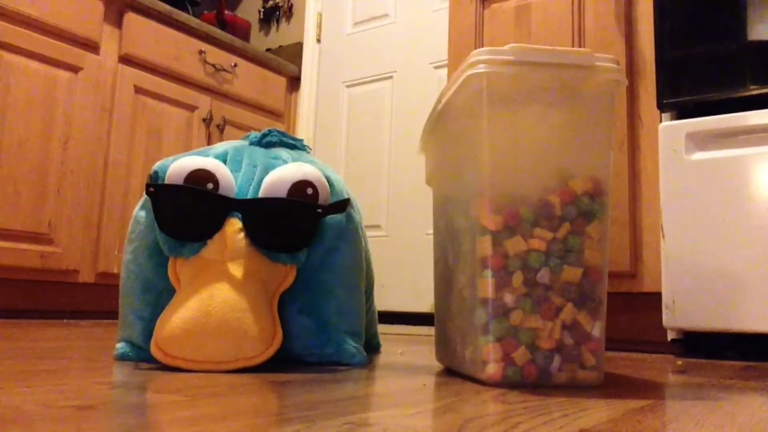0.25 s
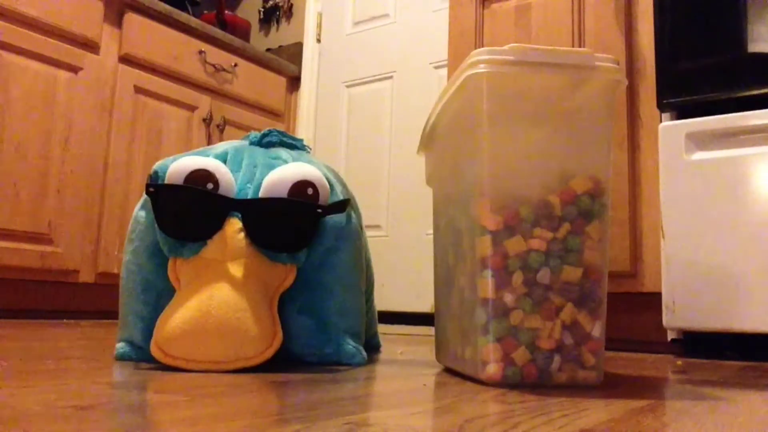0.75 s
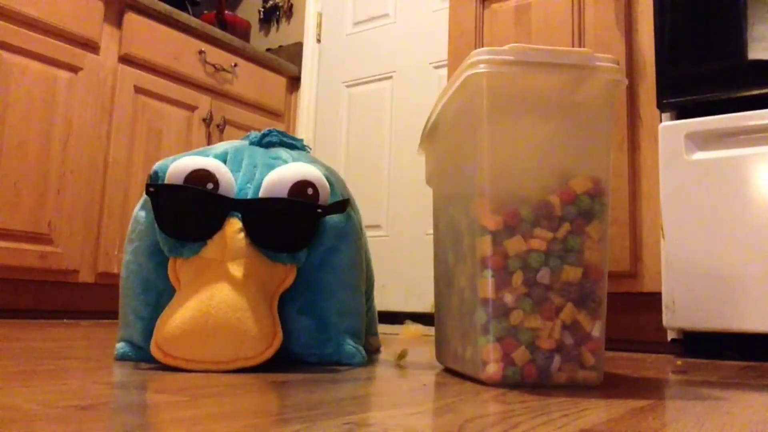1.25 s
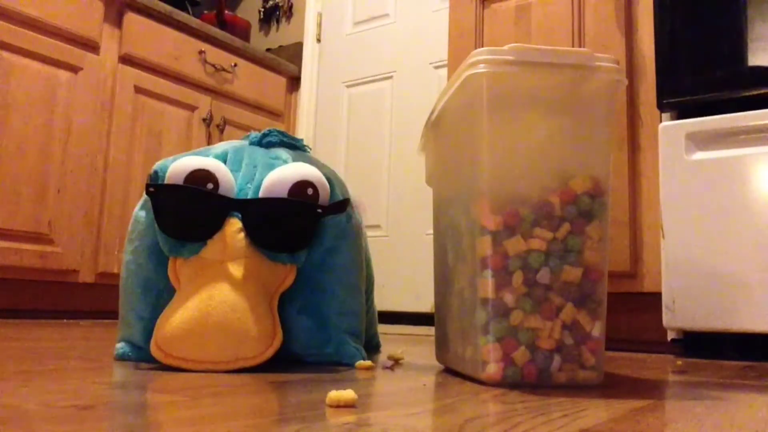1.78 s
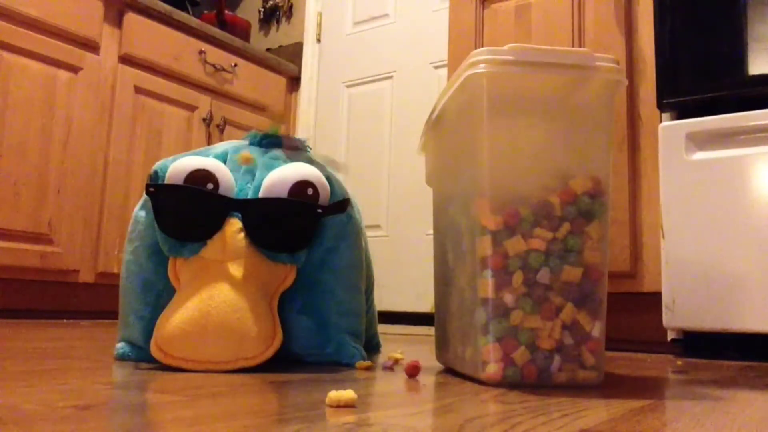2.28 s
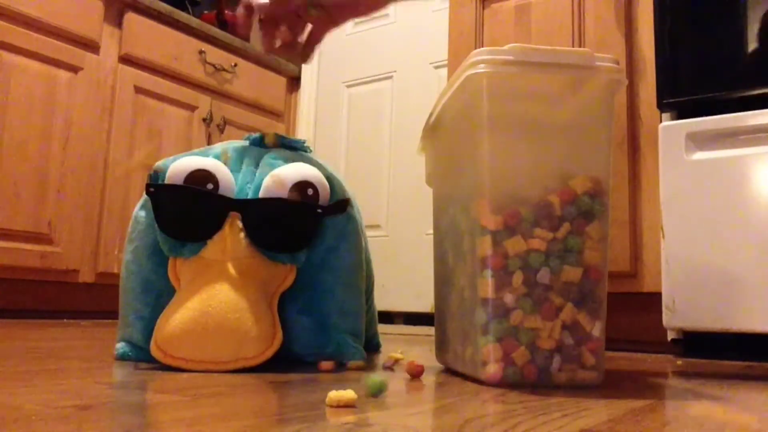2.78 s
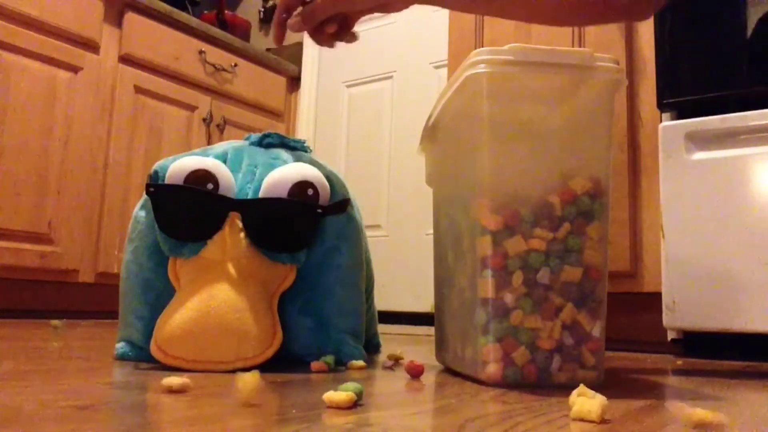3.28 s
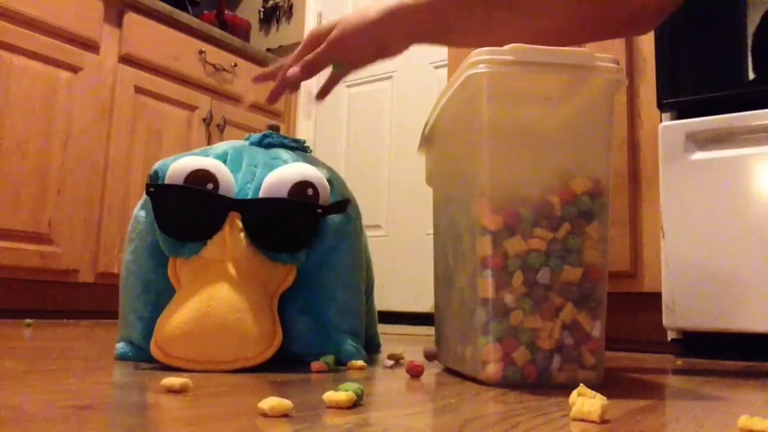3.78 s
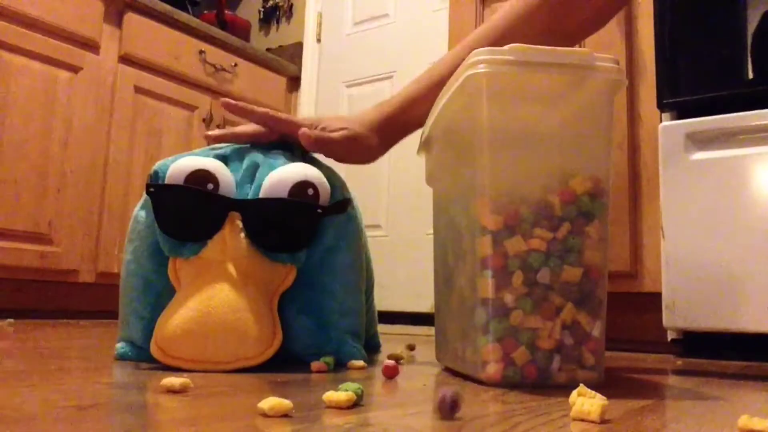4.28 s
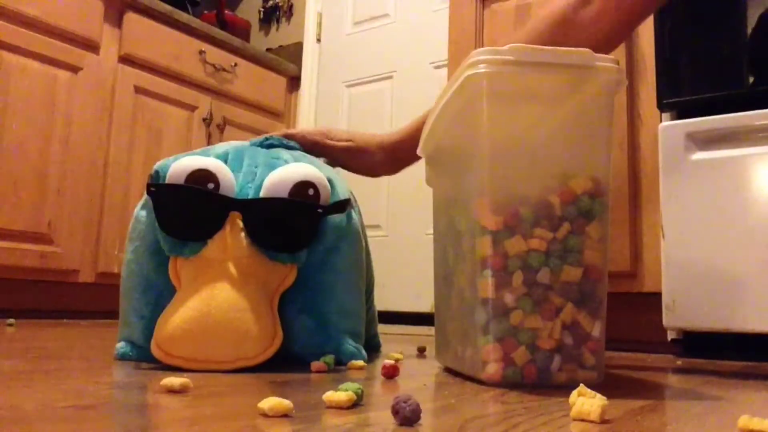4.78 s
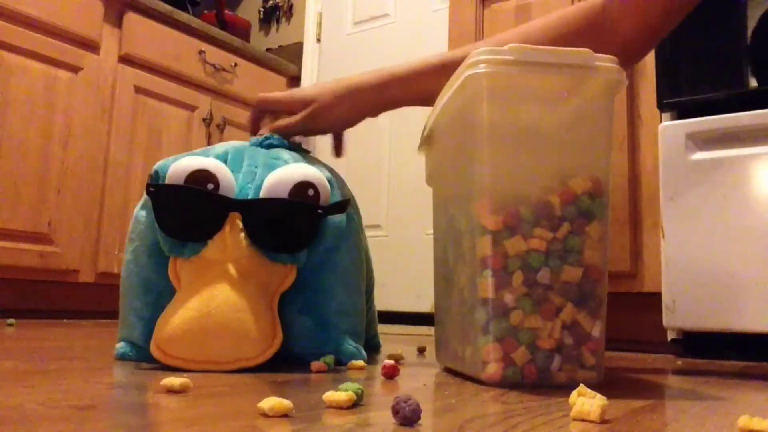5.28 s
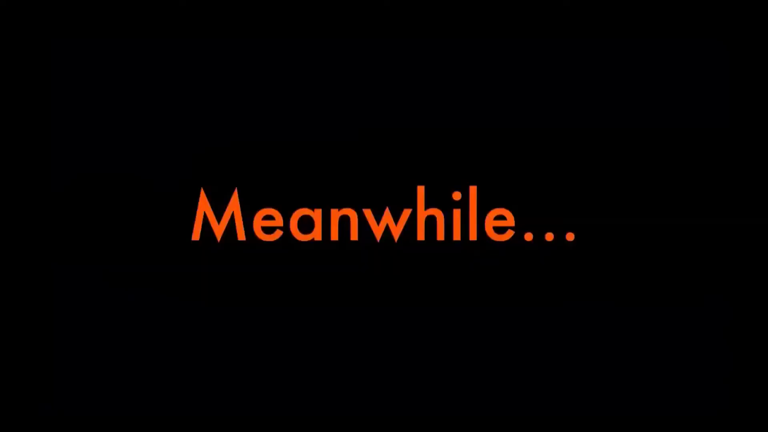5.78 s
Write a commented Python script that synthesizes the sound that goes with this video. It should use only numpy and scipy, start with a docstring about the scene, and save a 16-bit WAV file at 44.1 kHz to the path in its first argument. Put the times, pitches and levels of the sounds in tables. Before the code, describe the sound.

Small crunchy pieces bounce sharply on wooden boards close to the microphone, with one soft plush thud and faint rustling, before everything cuts dead.

```python
"""Cereal tossed at a plush toy, kitchen floor

Dry pieces bounce over a wooden kitchen floor, close to a phone microphone lying on it. Each landing ticks,
rings the piece for a few milliseconds and knocks the boards, built from noise bursts and decaying modes.
Short bright crackles swell, pieces tumble to rest farther off, one throw thuds into the plush; soft rustling
runs throughout. The hard room echoes landings, crackles and tumbles over a fridge of humming lines and fan
noise, then a dead stop.
"""
import sys
import numpy as np
from scipy import signal
from scipy.fft import rfft, irfft
from scipy.io import wavfile
from scipy.ndimage import uniform_filter1d

SR = 44100
rng = np.random.default_rng(int(sys.argv[2]) if len(sys.argv) > 2 else 0)


def wav_out(sig):
    """Save sig, one row per channel (or a flat mono array), as 16-bit PCM at SR to the path in sys.argv[1]."""
    wavfile.write(sys.argv[1], SR, np.round(np.clip(np.atleast_2d(sig).T, -1, 1) * 32767).astype(np.int16))


N = 266364
T = np.arange(N) / SR  # time line, s
AGE = np.arange(4096) / SR  # time since a blow, s

# fridge hum lines: [f/Hz, level/dB rms before wavering, wavering 0-1]
FRIDGE_LINES = [(119, -59, 0), (235.3, -55.5, 0.3), (356, -50.5, 1)]
# spectrum shape of the fridge's fan and air: [f/Hz, relative level/dB per Hz]
FRIDGE_AIR = [(30, -48.5), (60, -28), (95, -19.5), (115, -15.5), (165, 1.5), (280, -5), (345, 5),
              (420, -5.5), (650, -9.5), (900, -12), (1500, -22.5), (2500, -30), (5000, -31), (15000, -34.5)]
# faint rustle, later the hand on the plush fur: [t/s, level/dB rms]
RUSTLE_LEVEL = [(0, -62), (.4, -66), (1, -65), (4.2, -62), (4.45, -63), (4.85, -77)]
# louder landings: [t/s, ring level/dB over 1 ms, ring f/Hz, tick level/dB re ring, wood level/dB re ring]
LANDINGS = [(0.47, -13, 3580, -13, -8.5), (0.658, -17, 3920, -25, -3.5), (0.7883, -27, 2500, -18, 4),
            (0.84, -38, 3180, -26, 8), (0.8906, -28, 2960, -24, 0), (0.9015, -34, 2740, -24, -4),
            (0.935, -28, 2700, -24, -2), (0.9613, -18, 3750, -11.5, -4.5), (0.989, -23, 2580, -12, -1.5),
            (1.0296, -31.5, 2540, -6, 0), (1.0394, -36.5, 3150, -21, 3), (1.1264, -17, 3300, -12.5, -6),
            (1.2466, -28.5, 3050, -21, -5), (1.2828, -27, 2970, -17, -3.5), (1.3252, -38, 4740, -14, -12),
            (1.3668, -37.5, 3100, -18, -1.5), (1.4085, -35.5, 4450, -19, -7), (1.5298, -39, 4430, -13, -13),
            (1.6818, -38, 4400, -17, -14), (1.8135, -23, 2980, -14, -4), (1.897, -39, 2920, -16, -3),
            (1.9404, -35, 3170, -20.5, -7), (2.34, -27.5, 2660, -15.5, 3.5), (2.382, -30.5, 2810, -11, 0),
            (2.3897, -28, 2880, -11, 0), (2.446, -19.5, 3300, -15.5, 0.5), (2.4612, -26, 3300, -14, 2),
            (2.5074, -39, 2930, -25, 4.5), (2.5523, -34, 3330, -32, 2.5), (2.581, -26, 3720, -19, -1.5),
            (2.6102, -33, 3260, -21.5, -4.5), (2.6456, -20.5, 3120, -8.5, -5),
            (2.692, -23, 3470, -25.5, -6), (2.7203, -15.5, 3040, -17.5, -4), (2.7769, -23, 3670, -12, -6),
            (2.7879, -32.5, 2840, -25, 6.5), (2.8368, -23.5, 3800, -17, -19),
            (2.8425, -21.5, 4000, -22.5, -10.5), (2.8477, -26.5, 3370, -3, -0.5),
            (2.882, -28, 3630, -16, -6.5), (2.8968, -27.5, 3200, -32, -6.5),
            (2.9023, -23.5, 3700, -21.5, -2.5), (2.944, -20.5, 3530, -11.5, -12.5),
            (2.9577, -17.5, 3530, -20.5, -10.5), (2.9856, -20.5, 3390, -15, -11.5),
            (2.995, -27, 3340, -23, -10), (3.008, -18.5, 4160, -14.5, -12), (3.028, -33, 3400, -5, 1),
            (3.059, -29, 4040, -18, -11), (3.0975, -30.5, 3300, -8, -6), (3.1218, -30.5, 4070, -3.5, -2.5),
            (3.1787, -29.5, 3140, -9.5, -16), (3.2314, -28, 4060, -7, -6), (3.2808, -30.5, 4100, -9, -7.5),
            (3.362, -35.5, 3970, -27, -17), (3.414, -37, 3970, -26, -6), (3.6565, -33, 3060, -7.5, 4.5),
            (3.6815, -20, 3330, -33, -6), (3.789, -33.5, 3340, -28, -2), (3.8303, -33, 3130, -23, -3.5),
            (3.9111, -28, 3460, -16, -6.5), (3.9721, -38.5, 3170, -24, 4), (4.022, -37, 3080, -31, 1),
            (4.0388, -22.5, 3880, -48.5, -9.5), (4.0575, -19.5, 3300, -25, -4.5),
            (4.1885, -47, 3900, -25, -6.5), (4.218, -40, 3320, -27, -3), (4.2419, -29.5, 3570, -34, -4.5)]
# modes of a piece: [multiple of its ring pitch, relative level/dB, t60/s for a landing at -20 dB]
PIECE_MODES = [(.85, -11, 0.0018), (1, 12.5, 0.0015), (1.28, 9.5, 0.0011)]
# modes of the floor's hard top layer: [f/Hz, relative level/dB, t60/s]
TOP_LAYER_MODES = [(1030, 6, 0.0063), (1420, 3, 0.013), (2056, -14, 0.076)]
# floorboard modes, low and slow: [f/Hz, relative level/dB, t60/s]
BOARD_MODES = [(358, 1.5, 0.051), (424, 7.5, 0.026), (501, 2, 0.031), (756, -5, 0.039)]
# kitchen echo: [f/Hz, level/dB re the sound sent into the room, t60/s]
ROOM_ECHO = [(250, -8, 0.36), (500, -9, 0.076), (980, -3.5, 0.12), (1940, -17.5, 0.65), (3870, -12.5, 0.29),
             (6400, -6.5, .36), (8360, -3.5, .32), (14000, -9, 0.14)]
# short crackles of bright grains, most just before a landing: [start t/s, length/s, level/dB over 1 ms]
CRACKLES = [(0.895, .008, -39), (1.023, 0.01, -39), (1.105, .01, -39), (1.116, .006, -41),
            (2.831, .007, -20)]
# pieces tumbling to rest: [start t/s, length/s, first tap level/dB before scatter and balance, ring f/Hz]
TUMBLING_PIECES = [(0.999, .26, -35.5, 3420), (1.258, 0.39, -40, 3940), (1.89, .12, -45.5, 3650),
                   (2.478, 0.82, -38, 3320), (2.95, 0.89, -30, 3750), (3.707, 0.19, -44.5, 3560),
                   (4.121, 0.23, -43.5, 3650), (4.483, 0.083, -52.5, 3620), (4.689, 0.05, -52, 3700)]
# thud in the plush: [t/s, body level/dB over 1 ms]
PLUSH_THUDS = [(2.244, -11.5)]
# modes of the plush: [f/Hz, relative level/dB, t60/s]
PLUSH_MODES = [(171.6, -1, 0.17), (135, -15, 0.12), (241, -2, 0.1), (334, -1.5, 0.077), (518, -14, 0.063)]

AIR_DB = -47  # rms of the fridge's air noise
BOARD_DB = -2  # boards re the knock of the top layer
KNOCK_LAG_S = .0009  # bending waves in the wood trail the crack of the piece
CONTACT_S = 0.023  # the piece's ring builds up while it presses on the floor
SPOT_DETUNE = .11  # top layer varies with the landing spot, share of pitch
TAPS_PER_S, SETTLE_DB_PER_S = 70, 39  # taps weaken as a piece loses energy
TAP_SCATTER_DB, TAP_DETUNE = 8, 0.023  # from tap to tap; detune as a share of the pitch
STOP_S = 0.036  # the last rocking dies away
FIRM_TAP_DB, FIRMNESS = -36.5, 0.39  # lighter taps lose this many dB of crust and wood per dB
END_S, TOP_HZ = 5.585, 15500  # the stop; upper limit of the phone


def undb(db):
    """Decibels to gain."""
    return 10 ** (np.asarray(db) / 20)


def fade(t, t60):
    """Exponential decay, 60 dB down after t60."""
    return np.exp(-np.log(1000) * t / t60)


def unit(x):
    """Scale each row to the energy of 1 ms at full level."""
    energy = np.sum(x ** 2, axis=-1, keepdims=True)
    return x / np.sqrt(energy * 1000 / SR)


def band(x, lo_hz, hi_hz):
    """Causal band-pass."""
    edges = [lo_hz, min(hi_hz, .45 * SR)]
    return signal.sosfilt(signal.butter(2, edges, "band", fs=SR, output="sos"), x)


def on_log(hz, points, values):
    """Straight lines on a log-frequency axis."""
    return np.interp(np.log(hz + 1), np.log(points), values)


def walk(rate):
    """Smooth random drift with unit spread, from random steps taken at this rate in Hz."""
    k = int(SR / rate)
    steps = np.repeat(rng.standard_normal(N // k + 1), k)
    drift = uniform_filter1d(uniform_filter1d(steps, k), k)[:N]
    return drift / drift.std()


def ring(modes, pitch, age, scatter_db, detune):
    """One row of decaying modes per blow; chance varies each mode's strength and tuning."""
    out = 0
    for hz, db, t60 in modes:
        size, shift = rng.standard_normal((len(pitch), 2)).T[:, :, None]
        mode_hz = hz * pitch * (1 + detune * shift)
        strength = undb(db + scatter_db * size)
        out = out + strength * fade(age, t60) * np.sin(2 * np.pi * mode_hz * age)
    return out


def burst(count, lo_hz, hi_hz, t60):
    """One row per blow of modes too dense to tell apart: decaying noise in a band."""
    noise = rng.standard_normal((count, len(AGE)))
    return unit(band(noise * fade(AGE, t60), lo_hz, hi_hz))


def click(lo_hz, hi_hz):
    """One sharp contact, heard in one band."""
    return unit(band(signal.unit_impulse(len(AGE)), lo_hz, hi_hz))


def place(times, rows):
    """Lay each row on the time line at its moment."""
    out = np.zeros(N + rows.shape[1])
    starts = (np.ravel(times) * SR).astype(int)
    for i, row in zip(starts, rows):
        out[i:i + len(row)] += row
    return out[:N]


def fridge():
    """Compressor lines, some wavering in level and phase, over steady fan noise."""
    bin_hz = np.arange(N // 2 + 1) * SR / N
    shape = undb(on_log(bin_hz, *np.transpose(FRIDGE_AIR)))
    air = irfft(rfft(rng.standard_normal(N)) * shape, N)
    out = undb(AIR_DB) * air / air.std()
    for hz, db, waver in FRIDGE_LINES:
        drift = 1 - waver + waver * (walk(28) + 1j * walk(28)) / np.sqrt(2)
        line = np.real(drift * np.exp(2j * np.pi * hz * T))
        out = out + undb(db) * np.sqrt(2) * line
    return out


def rustle():
    """Soft, uneven rubbing: mid-band noise whose level drifts."""
    rub = band(rng.standard_normal(N), 700, 2800) * undb(1.5 * walk(20))
    return rub / rub.std() * undb(np.interp(T, *np.transpose(RUSTLE_LEVEL)))


def landings():
    """The crust ticks and the piece rings; slow bending waves bring the wood's knock a little later."""
    s, db, hz, tick_db, wood_db = np.array(LANDINGS, float).T[:, :, None]
    count, same = len(s), np.ones_like(s)

    # a hard landing presses the piece into the wood and damps it; a light one lets it ring longer
    damping = undb(.25 * (db + 20))
    # stretching time while dividing the pitch alters the decay but not the frequency
    shell = ring(PIECE_MODES, hz / damping, AGE * damping, scatter_db=2, detune=.025)
    piece = unit(shell * (1 - fade(AGE, CONTACT_S)) ** 1.4)
    # nearby surfaces scatter each crack just after it
    scattered = unit(burst(count, 2000, 4810, t60=0.014) * (1 - fade(AGE, 0.023)))
    piece = unit(piece + undb(-5) * scattered)
    tick = unit(click(6200, 14000) + undb(8) * burst(count, 4900, 11000, t60=.009))

    top_layer = ring(TOP_LAYER_MODES, same, AGE, scatter_db=3, detune=SPOT_DETUNE)
    top_layer = unit(top_layer * (1 - fade(AGE, .003)))
    grain = unit(burst(count, 850, 2800, t60=.03) * (1 - fade(AGE, .012)))
    knock = unit(click(700, 2300) + top_layer + undb(-3) * grain)
    board = ring(BOARD_MODES, same, AGE, scatter_db=2.5, detune=.07)
    board = unit(board * (1 - fade(AGE, .009)) ** 2)

    crack = place(s, undb(db) * (piece + undb(tick_db) * tick))
    wood = undb(db + wood_db) * (knock - undb(BOARD_DB) * board)
    return crack + place(s + KNOCK_LAG_S, wood)


def kitchen(x, build_s=0.012):
    """Bright slaps from walls and ceiling, then a diffuse tail: each band's energy fills the room and drains."""
    age = T[:SR // 2]
    points, db, t60 = np.transpose(ROOM_ECHO)
    edges = 177 * 2 ** (np.arange(14) / 2)  # half-octave bands, Hz
    tail = 0
    for lo, hi in zip(edges, edges[1:]):
        centre = np.sqrt(lo * hi)
        decay = (fade(age, on_log(centre, points, t60)) * (1 - fade(age, build_s))) ** 2
        energy = signal.oaconvolve(band(x, lo, hi) ** 2, decay / decay.sum())[:N]
        field = band(rng.standard_normal(N), lo, hi)
        level = undb(on_log(centre, points, db)) * np.sqrt(np.abs(energy))
        tail = tail + level * field / field.std()
    bright = band(x, 5500, 15000)
    slaps = sum(np.interp(T - delay_s, T, bright) for delay_s in (.0133, .0163))
    return tail + undb(-15) * slaps


def crackle(s, length_s, db, burst_db=-8):
    """Quick bright grains at uneven moments grow louder; each is a short ring with a burst of treble."""
    count = 8
    when, shift = rng.random((count, 2)).T[:, :, None]
    along = (np.arange(count)[:, None] + when) / count  # share of the crackle
    pitch = 3600 * (.8 + .4 * shift)  # Hz
    grains = unit(ring(PIECE_MODES, pitch, AGE, scatter_db=2, detune=0))
    grains = grains + undb(burst_db) * burst(count, 4500, 11000, t60=.006)
    return undb(db) * unit(place(s + length_s * along, along * grains))


def tumbling(s, length_s, db, hz, crust_db=-12, wood_db=-5):
    """Lopsided pieces roll and rock, tapping the floor at uneven moments, ever more lightly until they rest."""
    count = TAPS_PER_S  # a second's worth of taps
    late, size, shift = rng.standard_normal((count, 3)).T[:, :, None]
    since = np.abs(np.arange(count)[:, None] + .5 * late) / TAPS_PER_S
    tap_db = db - SETTLE_DB_PER_S * since + TAP_SCATTER_DB * np.tanh(size)
    pitch = hz * (1 + TAP_DETUNE * shift)

    taps = ring([(1, 0, .005)], pitch, AGE, scatter_db=0, detune=0)
    taps = unit(taps * (1 - fade(AGE, .002)))
    taps = unit(taps + undb(-3) * burst(count, 2900, 5000, t60=.025))
    crust = undb(crust_db) * burst(count, 4600, 19500, t60=0.0065)
    contact = crust + undb(wood_db) * click(970, 3900)
    taps = taps + undb(FIRMNESS * (tap_db - FIRM_TAP_DB)) * contact
    moving = np.clip((length_s - since) / STOP_S, 0, 1)
    return place(s + since, taps * moving * undb(tap_db))


def thud(brush_db=-28, rumble_db=-9):
    """The fur brushes, then soft stuffing gives slowly, so low modes dominate; the floor rumbles on under it."""
    s, db = np.array(PLUSH_THUDS).T[:, :, None]
    age = T[:SR // 2]
    body = ring(PLUSH_MODES, np.ones_like(s), age, scatter_db=0, detune=0)
    body = unit(body * (1 - fade(age, 0.017)) ** 2)
    brush = unit(band(rng.standard_normal(len(age)) * fade(age, 0.049), 400, 1930))
    swell = fade(age, 0.42) * (1 - fade(age, 0.04))
    rumble = unit(band(rng.standard_normal(len(age)) * swell, 125, 230))
    return place(s, undb(db) * (body + undb(brush_db) * brush + undb(rumble_db) * rumble))


def scene():
    """Landings and crackles near the phone; far tumbling sends more into the echo; the thud gets no echo."""
    near = landings() + sum(crackle(*row) for row in CRACKLES)
    far = sum(tumbling(*row) for row in TUMBLING_PIECES)
    echo = kitchen(near + undb(3.5) * far)
    direct = near + undb(-1.5) * far
    return (direct + echo + thud() + rustle() + fridge())[None]


def record(dry):
    """The sound stops dead within 5 ms; the phone drops the deep bass and the very top."""
    cut = dry * np.clip((END_S - T) / .005, 0, 1)
    thin = signal.sosfilt(signal.butter(2, 70, "high", fs=SR, output="sos"), cut)
    return signal.sosfilt(signal.ellip(8, .2, 70, TOP_HZ, fs=SR, output="sos"), thin)


dry = scene()
out = record(dry)
wav_out(out)
```